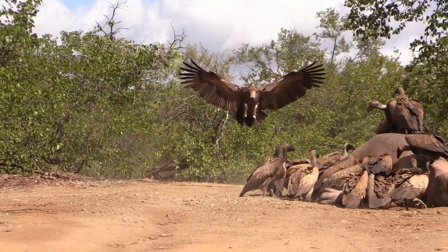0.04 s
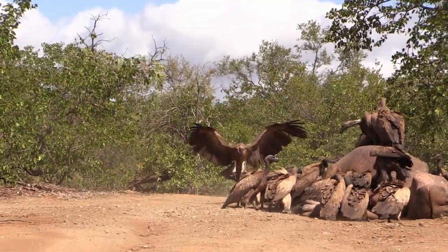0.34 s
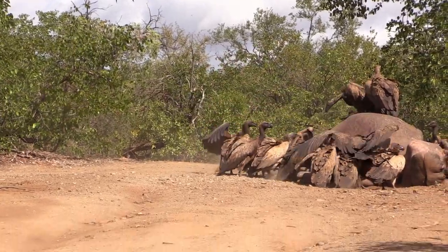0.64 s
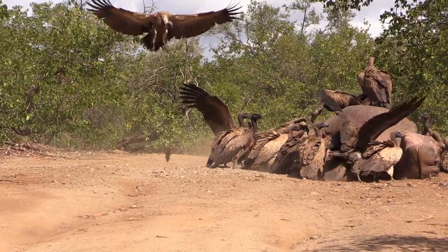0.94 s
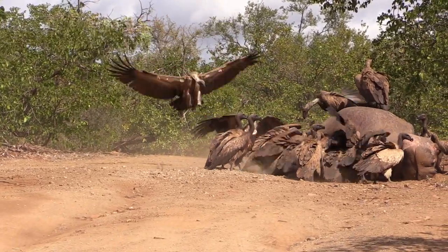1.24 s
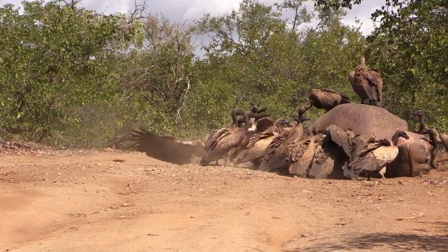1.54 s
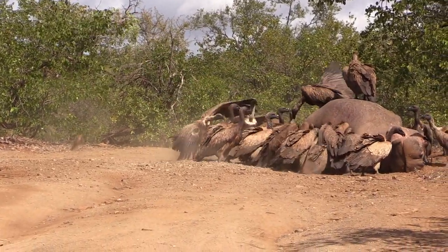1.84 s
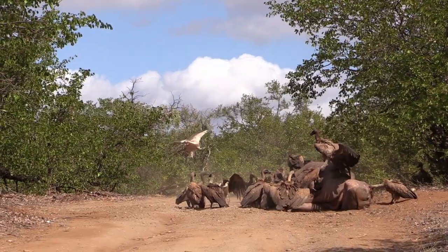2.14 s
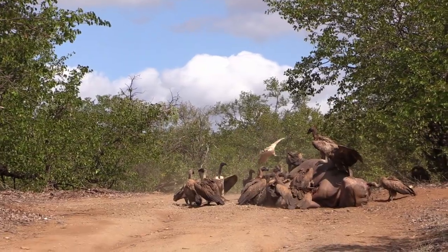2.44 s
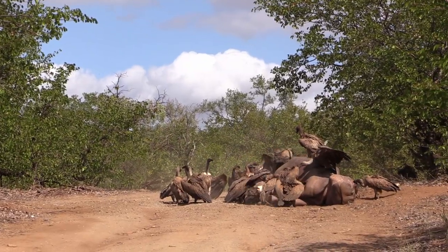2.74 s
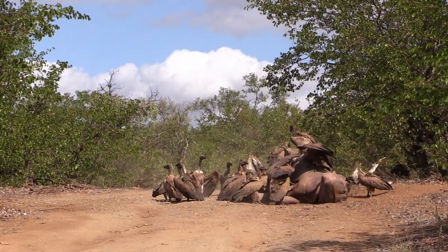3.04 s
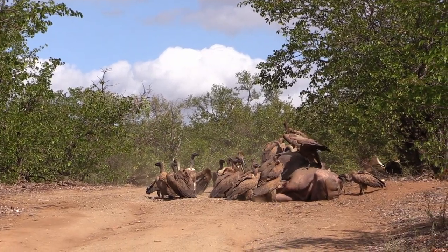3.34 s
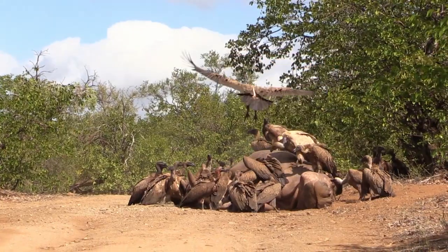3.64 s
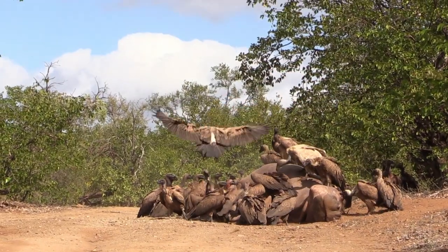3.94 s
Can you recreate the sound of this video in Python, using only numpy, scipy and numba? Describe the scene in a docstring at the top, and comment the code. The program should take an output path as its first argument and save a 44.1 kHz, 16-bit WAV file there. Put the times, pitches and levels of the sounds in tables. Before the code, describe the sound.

Vultures hiss over a carcass in open bush. One rasps close by, thinner hisses follow from farther off as wind buffets the microphone, then close squeaks, a throaty rattle and harsh hisses break out.

```python
"""Vultures squabble over a carcass in open bush, close to the microphone. Their throats rattle in
quickening puffs, ring with rasping air as they hiss, and lock into falling squeaks. Farther off,
other birds hiss thinly; wings and feet scuffle in the dust and dry twigs tick. The scrub gives a
faint echo. At the microphone the handled camera clicks once and wind buffets, over a bed of
rustling leaves and the drone of the camera body."""
import sys
import numpy as np
from scipy import signal
from scipy.fft import rfft, irfft
from scipy.io import wavfile
from scipy.ndimage import uniform_filter1d, map_coordinates
from numba import njit

SR = 44100
rng = np.random.default_rng(int(sys.argv[2]) if len(sys.argv) > 2 else 0)


def bounce(signal):
    """Save signal as a 16-bit WAV file at the path given by the first command-line argument."""
    frames = np.transpose(np.atleast_2d(signal))
    limited = np.clip(frames, -1, 1)
    pcm = np.round(limited * 32767).astype(np.int16)
    wavfile.write(sys.argv[1], SR, pcm)


N = 176400
T = np.arange(N) / SR
TOP_HZ = 15800  # upper limit of the recorder

# Three hisses at close range: t/s, level/dB, throat tuning/ratio, air against resonances/dB
FIRST_HISS = [(.678, -62, 0.97, 0), (.688, -45.5, 0.94, -0.5), (.78, -40.5, 0.95, -4),
              (.815, -40, 0.99, -2), (.86, -41, 0.85, 1), (.874, -48.5, 0.81, 15), (.92, -49, 0.73, 18)]
SECOND_HISS = [(3.48, -52.5, 0.93, 20), (3.589, -47, 0.97, 3), (3.596, -39, 1, -6.5), (3.65, -39, 0.95, 0),
               (3.685, -37, 0.97, -0.5), (3.716, -44.5, 0.92, 1), (3.74, -39, 0.98, -3),
               (3.785, -61, 0.89, 7)]
THIRD_HISS = [(3.916, -54, 0.92, -4), (3.928, -42.5, 1.02, -7), (3.974, -38, 1, -5), (4, -42, 1.07, -1)]
# Throat resonances of each: f/Hz, width/Hz, level/dB
FIRST_THROAT = [(1150, 170, -4.5), (1660, 270, -4), (2170, 310, 3.5), (3290, 240, -4.5), (5130, 250, -14)]
SECOND_THROAT = [(1234, 134, 6.5), (2205, 190, 3), (3190, 220, 3), (4170, 110, 0.5), (5300, 210, -4.5)]
THIRD_THROAT = [(1393, 65, -3), (1832, 104, -1.5), (2190, 240, -6.5), (2950, 120, -10), (3280, 180, -6.5)]
# Spectrum of air rushing through an open beak: f/Hz, level/dB
BEAK_AIR = [(200, -22), (520, 2), (760, -7), (1100, 2.5), (2200, 4.5), (3300, 0.5), (4500, -2), (6600, -3),
            (8200, -18.5), (11000, -27.5), (16000, -45)]
def near_hiss(rows, throat, pipe_hz, low_end_db):
    """Close by, a rasping air stream rings a bird's throat, brighter with effort."""
    db, tuning, air_db = curve(rows)
    rasp = undb(walk(341.5))
    rings = unit(sum(undb(ring_db) * band(noise() * rasp, hz * tuning, width)
                     for hz, width, ring_db in throat))
    air = unit(colour(windpipe(noise() * rasp, pipe_hz * tuning), BEAK_AIR))
    low_end = lowpass(air, hz=850)
    air = air + (undb(low_end_db) - 1) * low_end  # thinned out in the first and third hiss
    voice = (rings + undb(air_db) * air) / np.hypot(1, undb(air_db))
    effort_db = db - db.max()
    return during(rows) * undb(db) * treble_shelf(voice, hz=3500, db=effort_db + 1.5)


def windpipe(air, hz, feedback=.6):
    """Sound bounces along the windpipe, giving evenly spaced resonances hz apart."""
    return sum(feedback ** trip * map_coordinates(air, [(T - trip / hz) * SR], order=3, mode="mirror")
               for trip in range(4))


# Close throat rattles: t/s, pulses, first rate/Hz, rate step/Hz, first level/dB, level step/dB
RATTLES = [(3.4821, 13, 108.5, 2.2, -30, 0.18), (3.848, 3, 151.5, 2.5, -36.5, 4)]
# Spectrum of one pulse: f/Hz, level/dB
RATTLE_SPECTRUM = [(100, -13.5), (520, -1.5), (780, -15), (1200, -4), (2100, 3), (3100, -1), (3800, -9),
                   (5300, -6), (7000, -24), (15000, -49)]
def rattles(decay_s=.0023, jitter=.015):
    """The throat flaps open in separate puffs that come faster and louder."""
    out, t = np.zeros(N), T[:SR // 50]
    for start, count, rate_hz, step_hz, db, step_db in RATTLES:
        for k in range(count):
            puff = rng.standard_normal(len(t)) * np.exp(-t / decay_s)
            puff[0] += 4.8  # the flap's own slap, ahead of the air
            add(out, start, puff * undb(db + k * step_db))
            start += (1 + jitter * rng.standard_normal()) / (rate_hz + k * step_hz)
    return colour(out, RATTLE_SPECTRUM)


# Close squeaks: t/s, length/s, f/Hz, fall/share of f, level/dB, strongest f/Hz,
# half harmonics/dB, roughness/0-1
SQUEAKS = [(.785, .085, 1140, .2, -41, 2190, -2, 0.3), (3.285, 0.011, 1420, 0.036, -44, 3020, -8, .5),
           (3.299, 0.02, 1444, 0.16, -44, 2060, -15, 0.62),
           (3.314, 0.017, 1196, 0.085, -44.5, 2630, -16, .5),
           (3.366, 0.013, 1421, 0.068, -36.5, 3260, 7, 0.41),
           (3.37, 0.0176, 1188, 0.142, -45.5, 2730, -10, 0.6),
           (3.748, 0.034, 1170, 0.12, -38.5, 1670, -27, 0.18),
           (3.857, 0.046, 1212, 0.11, -35, 1720, -25, 0.29)]
def squeaks():
    """The throat locks into a short falling tone as the air fades; some split into half harmonics."""
    out = np.zeros(N)
    air = unit(lowpass(band(noise(), hz=4770, width=2700), hz=7700))
    multiples = np.arange(2, 15)[:, None] / 2
    is_half = multiples % 1 > 0
    for start, length, hz, fall, db, strongest_hz, half_db, roughness in SQUEAKS:
        progress = np.linspace(0, 1, int(length * SR))
        jitter = 1 + .095 * roughness * walk(1200)[:len(progress)]
        pitch = hz * (1 - fall * progress) * jitter
        phase = 2 * np.pi * np.cumsum(pitch) / SR
        octaves_away = np.abs(np.log2(multiples * hz / strongest_hz))
        gains = undb(-9 * octaves_away ** 1.15 + half_db * is_half)
        gains /= 1 + (multiples * hz / 4860) ** 6  # the top partials roll off
        tone = unit((gains * np.cos(multiples * phase)).sum(0))
        breath = 2 * (1 - progress) ** 2 * undb(-10) * air[int(start * SR):][:len(progress)]
        swell = 1.14 * np.sin(np.pi * progress ** 1.07)
        add(out, start, -(tone + breath) * undb(db) * swell)
    return out


# Three hisses from farther off in the bush: t/s, level/dB, centre f/Hz
FAR_THIN_HISS = [(1.955, -67, 3700), (1.968, -55, 3700), (2.09, -57.5, 4000), (2.24, -55.5, 5200),
                 (2.34, -57.5, 4870), (2.41, -49, 3450), (2.45, -48.5, 2960), (2.49, -66, 2810)]
FAR_FULL_HISS = [(1.95, -60, 2970), (2.15, -56.5, 3270), (2.42, -52.5, 3210), (2.52, -52, 3160),
                 (2.75, -64.5, 3050)]
FAR_BROAD_HISS = [(2.835, -57, 3380), (2.91, -50.5, 3680), (3.433, -51, 3860), (3.439, -86, 3850)]
# Throat resonances of the far birds: f/ratio to the centre, base width/Hz, level/dB
THIN_THROAT = [(.98, 950, 0.5), (1.19, 950, -4)]
FULL_THROAT = [(.72, 500, -8), (1, 480, 0), (1.33, 750, -2.5), (1.9, 1600, -12)]
def far_hiss(rows, throat, breadth):
    """A distant bird's long hiss: its throat resonances slide together, each wavering on its own."""
    db, centre_hz = curve(rows)
    rings = 0
    for ratio, width, ring_db in throat:
        gain = undb(ring_db + 2 * walk(29.97))
        air = noise()
        hz = centre_hz * ratio * (1 + .015 * walk(24.84))
        rings += gain * band(air, hz, breadth * width)
    return during(rows) * undb(db) * unit(lowpass(rings, hz=7740, order=7))


# Whistle inside the thin far hiss: t/s, f/Hz, level/dB
WHISTLE = [(2.07, 2120, -73), (2.1, 2083, -53.5), (2.27, 1698, -65.5), (2.42, 2105, -58)]
def far_whistle():
    """A faint, unsteady whistle in the distance dips and rises."""
    hz, db = curve(WHISTLE)
    pitch = hz * (1 + .02 * walk(500))
    tone = np.sqrt(2) * np.sin(2 * np.pi * np.cumsum(pitch) / SR)
    return during(WHISTLE) * undb(db + 2 * walk(80)) * tone


# Wings and feet in the dust: middle t/s, length/s, level/dB, centre f/Hz
SCUFFLES = [(0.376, 0.24, -65.5, 5600), (0.956, 0.3, -60, 2750), (1.273, 0.29, -60.5, 4360),
            (1.656, 0.048, -61.5, 4440)]
def scuffles():
    """Feathers brush in grainy swells around the carcass."""
    out = np.zeros(N)
    for middle, length, db, hz in SCUFFLES:
        swell = np.cos(np.pi * np.clip((T - middle) / length, -.5, .5))
        grains = noise() * undb(1.1 * walk(250))
        out += undb(db) * swell * unit(band(grains, hz, width=.69 * hz))
    return out


# Twigs in the scrub: t/s, peak level/dB, f/Hz
TWIG_TICKS = [(0.0225, -45, 5500), (.7455, -38, 7150), (1.6391, -39, 3900), (2.7229, -41.5, 6250)]
def twigs(decay_s=.003):
    """Dry twigs tick, each a brief burst of bright noise."""
    out = np.zeros(N)
    for start, db, hz in TWIG_TICKS:
        burst = noise() * (T >= start) * np.exp(-np.abs(T - start) / decay_s)
        tick = band(burst, hz, width=.82 * hz)
        out += undb(db) * tick / np.abs(tick).max()
    return out


def scrub_echo(birds, db=-9.5, t60_s=.21):
    """The surrounding scrub scatters the birds' sound back, differently to each microphone."""
    decay = np.exp(-np.log(1000) * T / t60_s)
    tails = [band(noise(), hz=2160, width=5600) * decay for _ in range(2)]
    wet = np.array([signal.fftconvolve(birds, tail)[:N] for tail in tails])
    return unit(wet) * np.std(birds) * undb(db)


# Modes of the camera body, at the microphones: f/Hz, relative level/dB, t60/s, left minus right/dB
CAMERA_MODES = [(590, -23.5, 0.017, -17), (1517, -3, 0.0094, 18.5), (1750, -6.5, 0.0085, -3),
                (2600, -1.5, 0.0049, 14), (7500, 2.5, 0.0013, -8)]
def camera_click(start_s=.9197, db=-12.5, rise_cycles=.98):
    """The handled camera clicks: a bright tick and a hollow ring, each mode nearer one microphone."""
    age = np.maximum(T - start_s, 0)
    out = 0
    for hz, mode_db, t60, pan_db in CAMERA_MODES:
        rise = 1 - np.exp(-age * hz / rise_cycles)
        decay = np.exp(-np.log(1000) * np.minimum(age / t60, 10))
        out += pan(undb(db + mode_db) * rise * decay * np.sin(2 * np.pi * hz * age), pan_db)
    return out


# Wind on the microphone: t/s, level/dB
WIND_LEVEL = [(0, -56), (.26, -71.5), (.42, -58), (.8, -63), (1.8, -63.5), (1.95, -61), (1.99, -46.5),
              (2.15, -51.5), (2.55, -44), (2.78, -54), (2.86, -48.5), (3.36, -59.5), (4, -67.5)]
# Spectrum of its rumble: f/Hz, level/dB
WIND_SPECTRUM = [(20, -44), (45, -15.5), (100, -0.5), (170, 1.5), (300, -3.5), (420, -8), (900, -37),
                 (3000, -56)]
# Hard buffets: t/s, envelope peak level/dB, f/Hz
BUFFETS = [(.357, -45.5, 128), (0.411, -41, 218), (1.371, -46, 158), (1.616, -48.5, 126),
           (1.862, -47.5, 123), (2.007, -39, 175), (2.378, -35.5, 170), (2.441, -32.5, 294),
           (2.574, -33, 233), (3.157, -38.5, 234), (3.267, -39.5, 269)]
def wind(flutter_db=3, rise_cycles=.555):
    """Wind strikes the microphone: a fluttering rumble with single harder buffets."""
    db, = curve(WIND_LEVEL)
    turbulence = noise() * undb(flutter_db * walk(89.8))
    out = undb(db) * unit(colour(turbulence, WIND_SPECTRUM))
    t = T[:SR // 10]
    for start, peak_db, hz in BUFFETS:
        age = hz * t / rise_cycles
        add(out, start, undb(peak_db) * age * np.exp(1 - age) * np.sin(2 * np.pi * hz * t))
    return out


# Spectrum of the leaves all around: f/Hz, level/dB
LEAF_SPECTRUM = [(30, 1), (200, -4.5), (800, 2), (2200, 6.5), (4000, -1.5), (6800, -2.5), (8500, -10.5),
                 (16000, -20.5)]
# Their rustle: t/s, level/dB, relative treble/dB
LEAF_LEVEL = [(0, -62, 2.5), (.2, -63, 4), (1.3, -59.5, 2.5), (3.43, -63.5, 5), (3.44, -57.5, -8)]
def leaves(stereo_width=.62):
    """Leaves rustle faintly across the bush, turning louder and duller near the end."""
    db, treble_db = curve(LEAF_LEVEL)
    mid, side = [unit(colour(noise() * undb(.79 * walk(300)), LEAF_SPECTRUM)) for _ in range(2)]
    rustle = mid + stereo_width * side * np.array([[1], [-1]])
    return treble_shelf(rustle, hz=3460, db=treble_db) * undb(db + .5 * walk(21))


def camera_drone(db=-55, drop_s=1.95, drop_db=8):
    """The camera body drones, weaker and in opposite phase on the right; the level steps down once."""
    drone = unit(band(noise(), hz=1074, width=125))
    gain = undb(db + walk(8.6) - drop_db * (T > drop_s))
    return drone * gain * np.array([[1], [-.35]])


def undb(db):
    """Decibels to gain."""
    return 10 ** (np.asarray(db) / 20)


def unit(x):
    """Scale to rms 1."""
    return x / np.sqrt(np.mean(x ** 2))


def noise():
    """White noise."""
    return rng.standard_normal(N)


def curve(rows):
    """Each column of a table joined by straight lines in time."""
    times, *columns = np.array(rows, float).T
    return [np.interp(T, times, column) for column in columns]


def during(rows):
    """1 from the first row's time to the last."""
    return (T >= rows[0][0]) & (T <= rows[-1][0])


def walk(rate_hz):
    """Smooth random wander with a spread of 1."""
    hold = max(int(SR / rate_hz), 1)
    steps = np.repeat(rng.standard_normal(N // hold + 1), hold)
    return unit(uniform_filter1d(steps, hold)[:N])


def colour(x, points):
    """Causal filter through (f/Hz, level/dB) points."""
    hz, db = np.array(points, float).T
    bin_hz = np.arange(N // 2 + 1) * SR / N
    gain = undb(np.interp(np.log(bin_hz + 1), np.log(hz), db))
    cepstrum = irfft(np.log(gain), N)
    cepstrum[1:N // 2] *= 2  # fold onto positive time for minimum phase
    cepstrum[N // 2 + 1:] = 0
    return irfft(rfft(x) * np.exp(rfft(cepstrum)), N)


@njit
def resonator(x, hz, width):
    """State-variable band-pass with a moving centre."""
    out, band_state, low_state = np.empty(len(x)), 0., 0.
    for i in range(len(x)):
        step, damping = np.tan(np.pi * hz[i] / SR), width / hz[i]
        ring = (band_state + step * (x[i] + 1e-18 - low_state)) / (1 + step * (step + damping))
        band_state = 2 * ring - band_state
        low_state += 2 * step * ring
        out[i] = damping * ring
    return out


def band(x, hz, width):
    """A steep resonance: the band-pass twice."""
    hz = np.minimum(hz + np.zeros(N), TOP_HZ)
    return resonator(resonator(x, hz, float(width)), hz, float(width))


def lowpass(x, hz, order=2):
    """Low-pass without delay."""
    return signal.sosfiltfilt(signal.butter(order, hz, fs=SR, output="sos"), x)


def treble_shelf(x, hz, db):
    """Raise or lower what lies above hz."""
    low = lowpass(x, hz)
    return low + undb(db) * (x - low)


def pan(x, db):
    """Place a sound; positive is left."""
    return x * undb(np.array([[db], [-db]]) / 2)


def add(out, start, x):
    """Mix a short sound in at a time."""
    i = min(max(int(start * SR), 0), N)
    out[i:i + len(x)] += x[:N - i]


def scene():
    """Near and far birds just left of centre, wind and camera at the microphone, bush all around."""
    near = (near_hiss(FIRST_HISS, FIRST_THROAT, pipe_hz=547.5, low_end_db=-7.5)
            + near_hiss(SECOND_HISS, SECOND_THROAT, pipe_hz=398, low_end_db=.5)
            + near_hiss(THIRD_HISS, THIRD_THROAT, pipe_hz=459, low_end_db=-11)
            + rattles() + squeaks())
    far = (far_hiss(FAR_THIN_HISS, THIN_THROAT, breadth=1)
           + far_hiss(FAR_FULL_HISS, FULL_THROAT, breadth=1)
           + far_hiss(FAR_BROAD_HISS, FULL_THROAT, breadth=3.6)
           + far_whistle())
    birds = near + far + scuffles() + twigs()
    return pan(birds, db=2) + scrub_echo(birds) + camera_click() + wind() + leaves() + camera_drone()


def record(dry):
    """The recorder cuts the top steeply."""
    return signal.sosfilt(signal.ellip(8, .2, 70, TOP_HZ, fs=SR, output="sos"), dry)


dry = scene()
out = record(dry)
bounce(out)
```